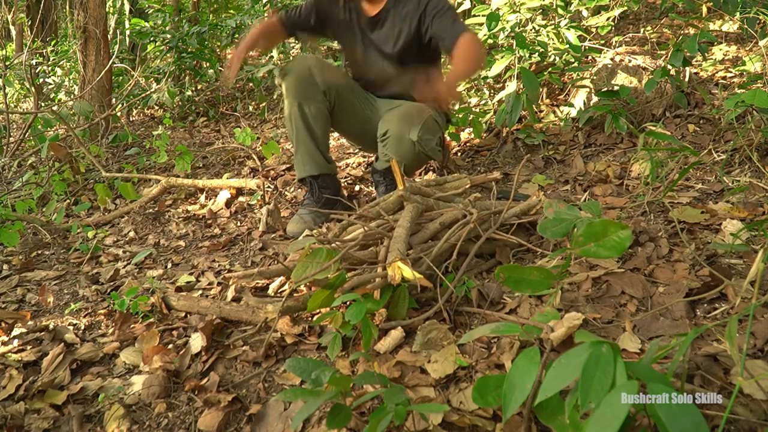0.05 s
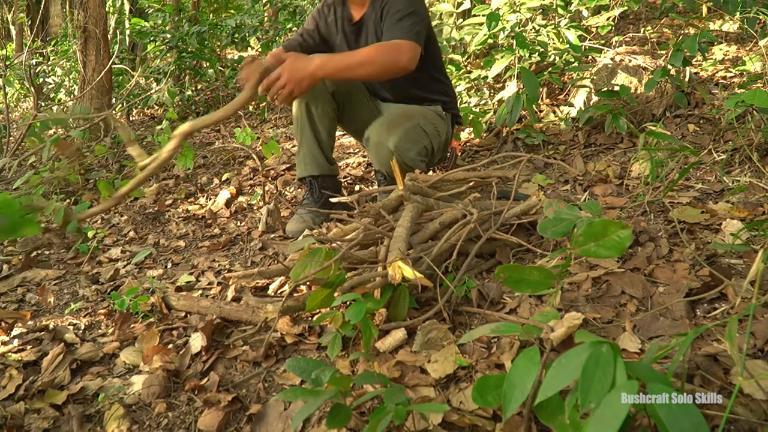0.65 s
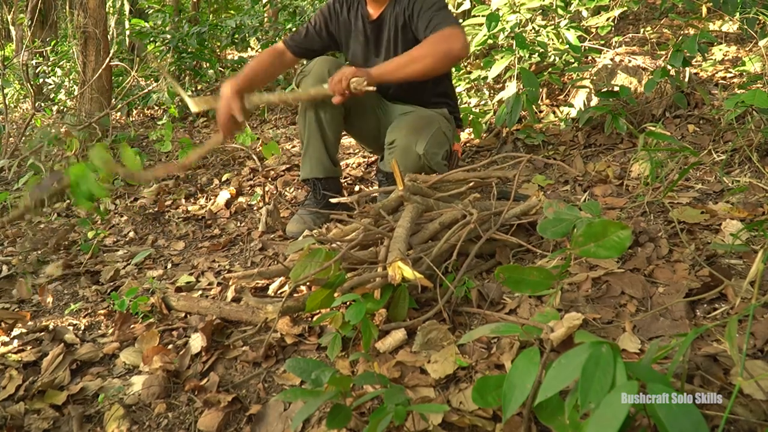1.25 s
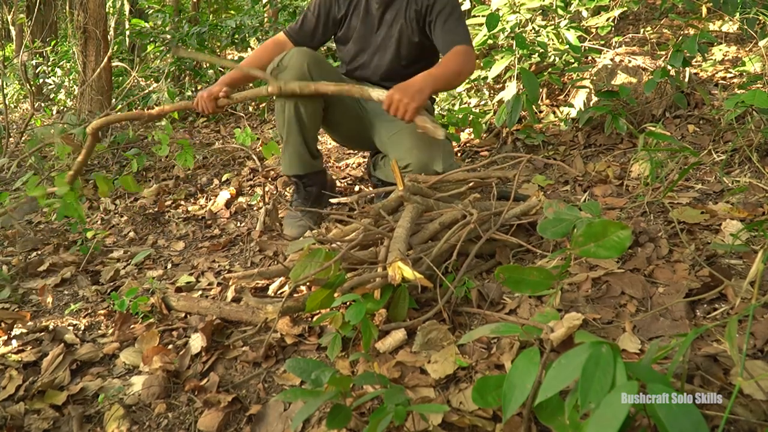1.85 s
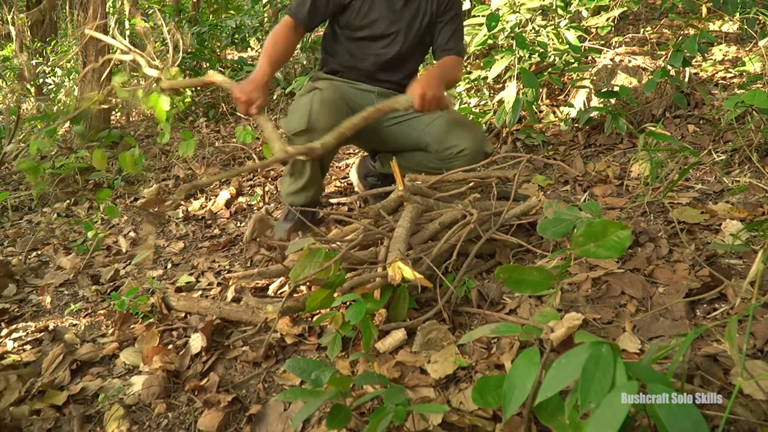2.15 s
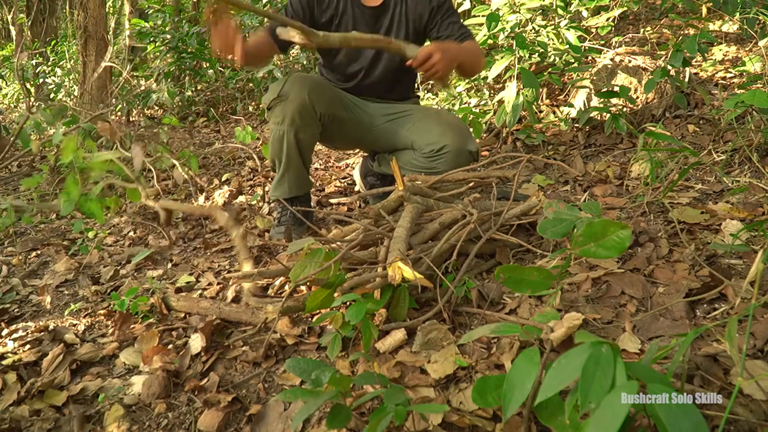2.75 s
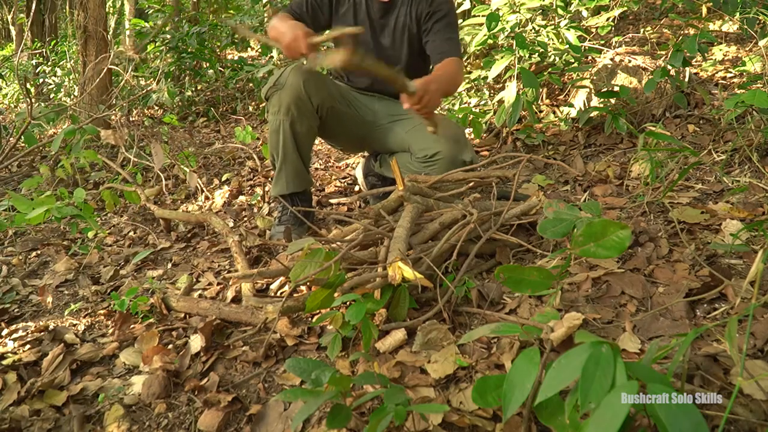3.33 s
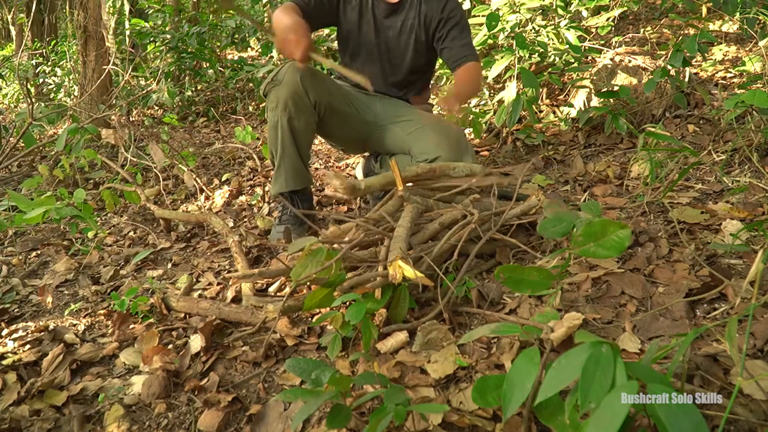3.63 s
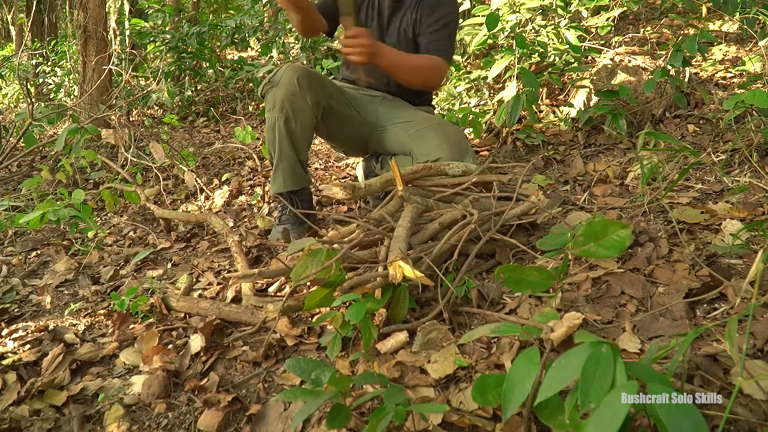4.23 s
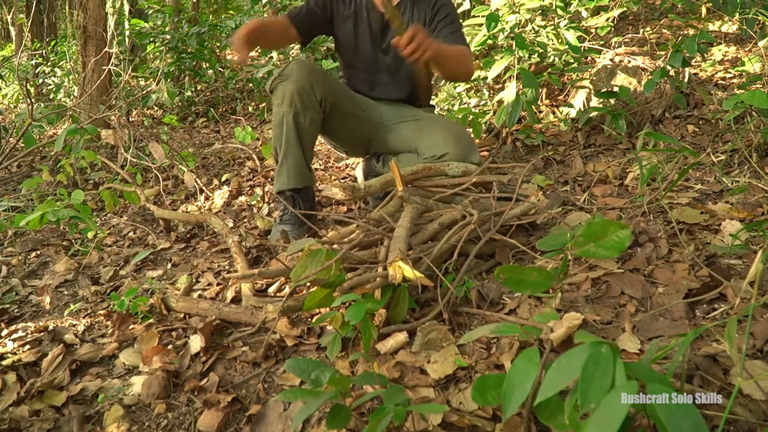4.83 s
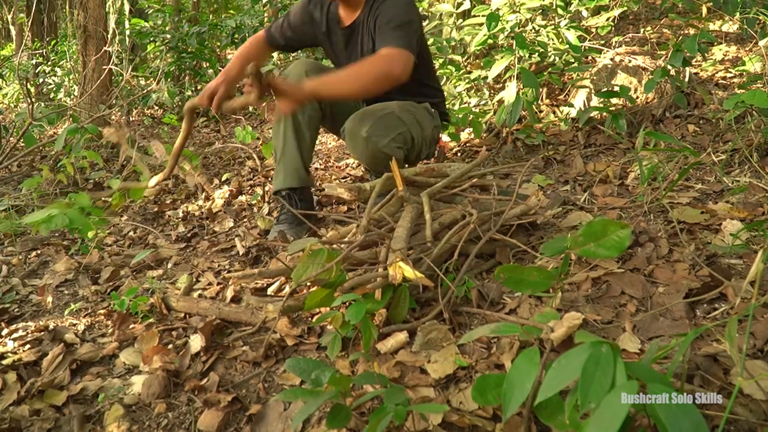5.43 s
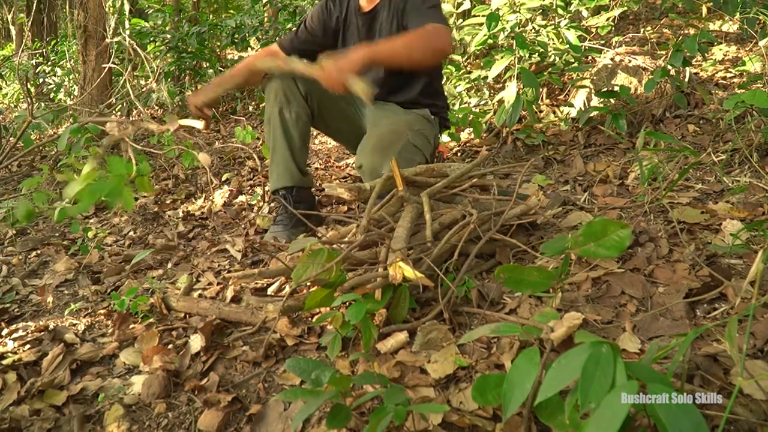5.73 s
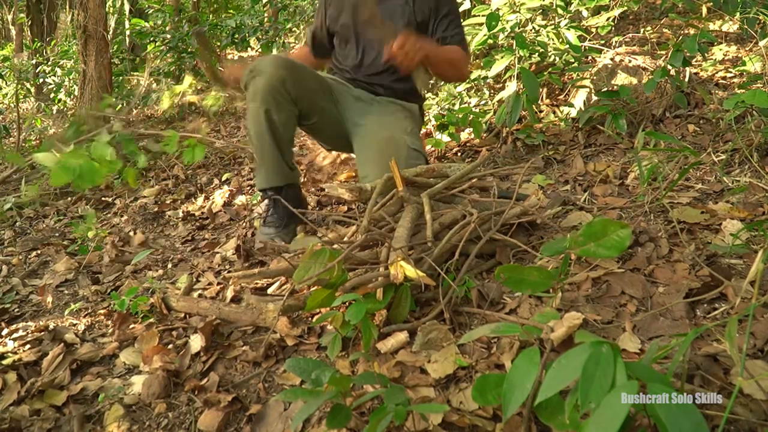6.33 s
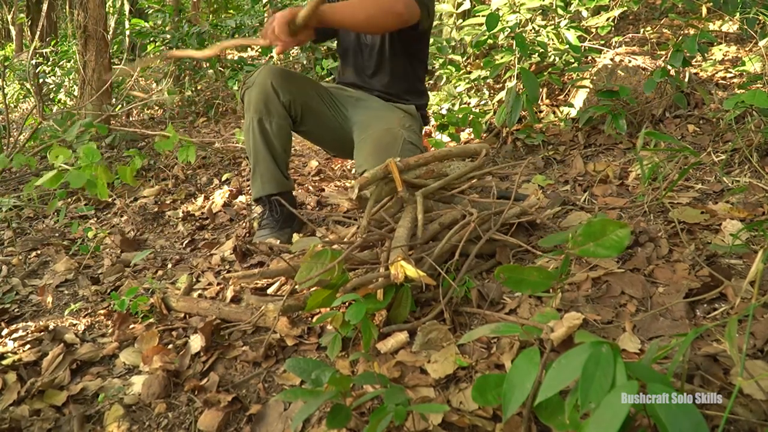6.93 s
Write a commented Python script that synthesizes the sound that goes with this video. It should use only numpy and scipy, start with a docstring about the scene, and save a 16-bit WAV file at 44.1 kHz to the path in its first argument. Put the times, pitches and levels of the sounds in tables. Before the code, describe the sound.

A stick clicks at about 0.2 seconds, with a few faint, distant bird whistles. From 0.5 seconds a leafy branch is dragged and swung close by, slightly to the left, swishing in surges and crunching dead leaves. Between 2 and 2.5 seconds it breaks in a quick run of sharp, dry cracks and wooden clicks, and the rustle dies away by 3 seconds. A crisp snap with a short splintery tail comes at 3 seconds, a smaller crack and knock at 3.3, and a piece drops into leaves at 3.6. Another sharp snap follows at 4.2. Sticks knock onto a pile around 5.1 seconds. Foliage swishes again from 5.4, building to a cluster of cracks and loud clacks between 6 and 6.4, with a few last snaps near 6.7. A faint low engine drone and soft forest hiss run underneath, with very little echo.

```python
"""A stick clicks and dry leaves swish as someone drags branches over a forest floor, snaps them
and drops the pieces on a pile. Bent wood fractures in quick runs of cracks, struck sticks ring in
their bending modes, and countless small contacts merge into the rustle of foliage and dead leaves.
The trees scatter the sound of the wood and the ground reflects the rustle;
far off there is a low drone and birds call."""
import sys
import numpy as np
from scipy import signal
from scipy.fft import rfft, irfft, next_fast_len
from scipy.io import wavfile
from scipy.ndimage import uniform_filter1d

SR = 44100
rng = np.random.default_rng(int(sys.argv[2]) if len(sys.argv) > 2 else 0)


def pcm_store(signal):
    """Save signal as 16-bit PCM."""
    levels = np.round(np.clip(np.atleast_2d(signal), -1, 1) * 32767)
    wavfile.write(sys.argv[1], SR, levels.astype(np.int16).T)


N = 307377
TIME = np.arange(N) / SR

# A branch gives way: t/s, level/dB, f/Hz, left minus right/dB, gap to the last warning fibre/s,
# growth per fibre/dB, tail length/s, tail hiss/dB, tail crackle/dB
BREAKS = [(2.056, -18.5, 3800, 5, 0.028, 18, 0.097, -44, -28),
          (3.029, -17, 8130, 2, 0.0067, 5.5, 0.11, -29.5, -45),
          (4.198, -19, 7680, 1, 0.009, 5.5, 0.079, -29, -37),
          (6.2543, -18.5, 4600, 2.5, .0425, 4.5, 0.095, -24, -28.5)]


def breaks(count=4, hurry=1.12, pitch_step=1.24):
    """Progressive fracture: a bent branch fails fibre by fibre, each crack sooner, louder and lower."""
    out = np.zeros((2, N))
    for s, db, hz, pan_db, gap_s, growth_db, *_ in BREAKS:
        for to_go in range(count):  # counted back from the break
            fibre = crack(db - growth_db * to_go, hz * pitch_step ** to_go, pan_db)
            add(out, s - gap_s * to_go ** hurry, fibre)
    return out


def cracks():
    """Brittle fracture: side twigs and the last splinters snap one by one."""
    # t/s, level/dB, f/Hz, left minus right/dB
    snaps = [(0.185, -28, 4150, -4), (0.308, -35, 4670, -4), (1.3797, -27.5, 5720, 2),
             (2.0385, -22, 6400, 8), (2.0635, -19.5, 4000, -1), (2.0942, -21.5, 4400, 3),
             (2.1816, -19, 4960, 7), (2.203, -25, 5000, 9), (2.3778, -22, 4170, 2),
             (2.4145, -19.5, 5960, 10), (2.4758, -21.5, 7100, 10), (3.025, -26, 10540, 21),
             (3.0523, -20.5, 7500, -1), (3.0694, -27, 15200, 8), (3.09, -21, 6250, 3),
             (3.3163, -26, 5000, 2.5), (3.397, -42, 6000, -3), (3.8508, -43, 5440, -7),
             (4.286, -37, 4380, -4), (4.7684, -49.5, 8400, 4), (5.1173, -36, 2770, -4.5),
             (5.249, -30.5, 4130, -4), (5.289, -21.5, 4970, -4), (5.315, -37, 4400, -2),
             (6.056, -23, 4400, 7), (6.0699, -21.5, 3290, -0.5), (6.1026, -23.5, 8000, 5),
             (6.145, -25.5, 5050, 4), (6.1618, -21, 5400, 2), (6.3837, -31, 4300, -1),
             (6.6793, -22.5, 4260, -3.5), (6.7056, -27, 6340, -6), (6.8771, -27.5, 8070, 4)]
    out = np.zeros((2, N))
    for s, db, hz, pan_db in snaps:
        add(out, s, crack(db, hz, pan_db))
    return out


def crack(db, hz, pan_db, release_s=0.00085, splinter_s=0.014, splinter_db=-20, burst_db=-1.5, wood_db=-7):
    """Sudden release of strain: a fibre lets go and rings the wood; ragged finer splinters follow."""
    t = TIME[:SR // 5]
    low_hz, high_hz = hz / 1.6, hz * 1.31
    ragged = unit(uniform_filter1d(rng.standard_normal(len(t)), size=24))
    decay = np.exp(-t / release_s) + undb(splinter_db + 4.6 * ragged) * np.exp(-t / splinter_s)
    burst = spread(rng.choice([-1., 1.], (3, len(t))), apart_hz=16000) * decay
    # thick fibres crack low, thin ones only tick
    burst = band(burst, order=3, hz=0.67 * low_hz, kind="high")
    burst = band(burst, order=2, hz=1.4 * high_hz, kind="low")
    wood = ring(low_hz, 1.3 * low_hz, t60=0.016, tilt_db=3.5)
    sound = undb(burst_db) * strike(burst) + undb(wood_db) * wood
    return sound * undb(db) * place(pan_db)


def knocks():
    """Impulse excitation: sticks click and ring as they spring apart, collide or land on the pile."""
    # t/s, level/dB, first mode f/Hz, second mode f/Hz, first mode t60/s, tilt/(dB/octave), click/dB
    blows = [(0.178, -21.5, 1150, 1686, 0.035, 2, -26), (2.083, -16, 1390, 2030, 0.018, -2.5, -23),
             (2.1042, -26, 1460, 2220, .03, -15, -17.5), (2.389, -23.5, 686, 1350, 0.094, 8, -28),
             (2.78, -25, 790, 2560, 0.068, -9, -51), (3.312, -23, 773, 2575, 0.04, 10, -46),
             (3.4163, -35, 710, 1740, 0.05, 2.5, -30.5), (3.534, -42, 1540, 2660, 0.048, -7.5, -50),
             (3.6178, -33.5, 762, 1510, 0.071, -24, -36.5), (4.1998, -32, 933, 1980, 0.048, -6.5, -28),
             (4.855, -44.5, 837, 4630, 0.078, -1, -60.5), (5.127, -22, 1174, 1735, 0.058, -12, -39),
             (5.1555, -29, 570, 926, 0.11, -0.5, -28.5), (5.175, -35, 586, 1170, .07, 2, -39),
             (6.255, -30.5, 710, 1340, 0.044, -4, -24), (6.3102, -18, 2000, 2800, 0.015, -29, -19),
             (6.3698, -12.5, 1920, 2760, 0.02, -8, -26)]
    out = np.zeros((2, N))
    for s, db, first_hz, second_hz, t60, tilt_db, click_db in blows:
        wood = undb(db) * ring(first_hz, second_hz, t60, tilt_db) / 2
        click = crack(click_db, 1.75 * second_hz, pan_db=-3)
        add(out, s, wood + click)
    return out


def ring(first_hz, second_hz, t60, tilt_db, damping_power=0.17):
    """Damped free vibration: a struck stick rings in its bending modes, the higher ones dying sooner."""
    # Upper modes of a crooked stick: ratio to the second mode, level/dB
    upper_modes = [(1, 5), (1.351, -5.5), (1.829, -0.5), (2.17, -2.5), (2.8, -5)]
    t = TIME[:SR // 5]
    modes = [(first_hz, 0)] + [(second_hz * k, db) for k, db in upper_modes if second_hz * k < SR / 2]
    sound = 0
    for i, (hz, db) in enumerate(modes):
        gain = (-1) ** i * undb(db + tilt_db * np.log2(hz / first_hz))
        decay = np.exp(-np.log(1000) * t * (hz / first_hz) ** damping_power / t60)
        sound = sound + gain * np.sin(2 * np.pi * hz * t) * decay
    return strike(band(sound, order=3, hz=0.59 * first_hz, kind="high"))


def leaves(twig_db=-11):
    """Friction and impact: moving wood makes foliage swish, dead leaves crunch and the earth scuff."""
    # The leafy branch is pulled, swung or carried: t/s, length/s, swish/dB, crunch/dB, scuff/dB
    drags = [(0.065, 0.02, -57, -61, -66), (0.31, 0.12, -53, -48, -60.5), (0.485, 0.15, -28.5, -37, -49),
             (0.6, 2.1, -42.5, -58.5, -64.5), (0.675, 0.15, -30, -37, -47.5),
             (1.03, 0.12, -40.5, -55.5, -69), (1.565, 0.038, -32.5, -49, -59),
             (1.66, 0.018, -24, -36, -42.5), (1.77, 0.043, -37, -51.5, -57),
             (1.908, 0.29, -27, -39.5, -54.5), (2.305, 0.064, -29.5, -47, -52),
             (2.36, 0.11, -29, -37.5, -48.5), (2.76, .17, -49, -56, -60), (3.82, 0.02, -56.5, -72, -65),
             (5.27, 2.29, -41.5, -55, -64.5), (5.45, 0.092, -41.5, -47, -64), (5.6, 0.04, -29, -34, -48.5),
             (5.69, 0.033, -38, -43, -52), (5.83, 0.05, -30.5, -40, -51), (5.945, 0.15, -31, -42, -59.5),
             (6.255, 0.14, -25.5, -31, -42.5), (6.43, .13, -37, -46.5, -60),
             (6.66, 0.033, -45, -44.5, -56.5)]
    # Wood lands in dead leaves: t/s, length/s, swish/dB, crunch/dB, scuff/dB
    landings = [(0.615, .02, -48, -55, -44.5), (2.185, 0.019, -28, -30.5, -43.5),
                (2.775, 0.032, -36.5, -44.5, -55), (3.614, 0.034, -36.5, -34, -44.5),
                (5.125, 0.11, -48.5, -43.5, -45.5), (5.29, 0.06, -47, -42, -50.5)]
    # Where the foliage is: t/s, left minus right/dB
    sweep = [(.4, 0), (.6, 6.5), (1.95, 6), (2.2, 3), (2.8, 5.5), (3.1, -5), (5.3, 3), (5.45, 4.5),
             (6.0, 5.5), (6.3, 1.5), (6.97, 3.5)]
    # Spectra of foliage, dead leaves and earth: f/Hz, level/dB
    foliage = [(2500, -47), (4500, -7.5), (6200, -0.5), (8000, 1.5), (10000, -3.5), (16000, -3.5)]
    dead_leaves = [(900, -41), (1500, -2), (2100, 0), (2700, 1), (4000, 3), (5500, -4.5), (9000, -38)]
    earth = [(150, -36), (340, -3.5), (520, -10), (780, 4.5), (1150, -1), (2500, -15.5)]
    drag_power = stir(drags, attack_s=0.031, sag_db_s=0.6, release_db_s=164)
    landing_power = stir(landings, attack_s=0.0067, sag_db_s=65, release_db_s=222)
    swishing, crunching, scuffing = np.sqrt(drag_power + landing_power)
    pan_db, = curves(sweep)
    brushing = rustle(foliage, rate=16000, scatter_db=0, flutter_db=0.76, apart_hz=1858)
    swish = swishing * (brushing + undb(twig_db) * twigs())
    crunch = crunching * rustle(dead_leaves, rate=9000, scatter_db=1, flutter_db=1.6, apart_hz=2650)
    scuff = scuffing * rustle(earth, rate=3000, scatter_db=2, flutter_db=0.84, apart_hz=3600)
    return swish * place(pan_db) + crunch * place(0.5 * pan_db) + scuff


def rustle(spectrum, rate, scatter_db, flutter_db, apart_hz):
    """Shot noise: countless random contacts of uneven size merge, swelling in small flurries."""
    hits = rng.random((3, N)) < rate / SR
    sizes = undb(scatter_db * np.minimum(rng.exponential(size=(3, N)), 6))
    flurry = unit(uniform_filter1d(rng.standard_normal(N), size=300))
    contacts = spread(hits * sizes * rng.standard_normal((3, N)), apart_hz) * undb(flutter_db * flurry)
    return colour(crinkle(contacts, depth_db=2.5), spectrum)


def crinkle(x, depth_db):
    """Random modulation: leaves of different sizes take turns, so each band swells by itself."""
    spectra = signal.stft(x, nperseg=512)[2]
    swell = uniform_filter1d(rng.standard_normal(spectra.shape[1:]), size=16, axis=0)  # over frequency
    swell = uniform_filter1d(swell, size=9, axis=1)  # over time
    return signal.istft(spectra * undb(depth_db * unit(swell)))[1][:, :N]


def stir(events, attack_s, sag_db_s, release_db_s, hop=32):
    """Incoherent sources add in power: in each layer, events build up, sag and die away."""
    power = 0
    for s, length, *layers_db in events:
        age = np.maximum(TIME[::hop] - s, 0)
        fall_db = sag_db_s * age + release_db_s * np.maximum(age - length, 0)
        envelope = np.minimum(age / attack_s, 1) * undb(-fall_db)
        power = power + np.outer(undb(layers_db), envelope) ** 2
    return np.repeat(power, hop, axis=1)[:, :N]


def twigs(rate=30, scatter_db=4, tick_s=0.00083):
    """A Poisson process: tiny twigs and leaf stalks tick independently of one another."""
    hits = (rng.random(N) < rate / SR) * undb(scatter_db * np.minimum(rng.exponential(size=N), 2))
    decay = signal.lfilter([1], [1, -np.exp(-1 / (tick_s * SR))], hits)
    return unit(band(decay * rng.standard_normal(N), order=2, hz=3030, kind="high"))


def break_tails(pan_db=2, crackle_edge_share=0.29):
    """Exponential decay: a short, bright hiss and a coarser crackle linger after each break."""
    # Spectra of the hiss and the crackle: f/Hz, level/dB
    hiss_spectrum = [(2500, -26), (4500, -10), (6500, 3.5), (9000, 2.5), (12000, -2.5), (16000, -1)]
    crackle_spectrum = [(900, -40), (1500, -6), (2200, -13), (3000, 1), (4200, 1.5), (6000, -5),
                        (9000, -25)]
    hiss = rustle(hiss_spectrum, rate=12000, scatter_db=4, flutter_db=2.7, apart_hz=1910)
    crackle = rustle(crackle_spectrum, rate=3500, scatter_db=1, flutter_db=2, apart_hz=2700)
    out = 0
    for s, _, hz, *_, length, hiss_db, crackle_db in BREAKS:
        power = stir([(s, length, hiss_db, crackle_db)], attack_s=0.013, sag_db_s=57, release_db_s=244)
        fine, coarse = np.sqrt(power)
        out = out + fine * hiss + coarse * band(crackle, order=4, hz=crackle_edge_share * hz, kind="high")
    return out * place(pan_db)


def thuds():
    """Band-limited noise: wide bands make dull low bumps, a narrow one the hum of a thrumming stick."""
    # t/s, length/s, f/Hz, half bandwidth in natural log of frequency, level/dB
    bumps = [(0.175, 0.053, 347, 0.17, -49.5), (0.419, 0.087, 234, 0.26, -51.5),
             (0.567, 0.14, 394, 0.15, -47.5), (2.771, 0.095, 330, 0.15, -45),
             (3.49, .22, 173, 0.038, -51.5), (3.616, 0.052, 312, 0.16, -46), (6.298, 0.23, 349, 0.18, -46)]
    out = np.zeros((2, N))
    for s, length, hz, width, db in bumps:
        age = np.linspace(0, 1, int(length * SR))
        edges_hz = hz * np.exp([-width, width])
        body = band(rng.standard_normal(SR // 2), order=2, hz=edges_hz, kind="band")[-len(age):]
        add(out, s, undb(db) * unit(body) * np.minimum(10 * age, 1) * (1 - age))
    return out


def handling(count=18, mean_db=-59, scatter_db=3, hz=6500):
    """Small-scale fracture: bits of bark tick faintly at random as the sticks are handled."""
    out = np.zeros((2, N))
    for when, size, pitch in rng.random((count, 3)):
        tick = crack(mean_db + scatter_db * (2 * size - 1), hz * 2 ** (pitch - .5), pan_db=-2)
        add(out, when * TIME[-1], tick)
    return out


def ground(x, share=0.22, soft_hz=3000, lag_s=0.001716):
    """Interference: a dull, inverted reflection from the soft ground ripples the low spectrum."""
    dull = band(x, order=1, hz=soft_hz, kind="low")
    reflection = np.array([np.interp(TIME - lag_s, TIME, channel) for channel in dull])
    return x - share * reflection


def trees(x, t60=0.16, build_s=0.0025, echo_db=-14):
    """Scattering: trunks and foliage return a short, diffuse echo."""
    t = TIME[:SR // 2]
    envelope = np.exp(-np.log(1000) * t / t60) * (1 - np.exp(-t / build_s))
    echo = spread(rng.standard_normal((3, len(t))), apart_hz=2500) * envelope
    return undb(echo_db) * signal.fftconvolve(x, unit(echo) / np.sqrt(len(t)), axes=1)[:, :N]


def birds(sag_per_s=0.44, waver=0.038, direct_db=-6, echo_db=-4):
    """Frequency modulation: far whistles sag and waver in pitch, blurred by the forest's echo."""
    # t/s, length/s, starting f/Hz, level before the forest/dB
    calls = [(0, 0.034, 3070, -46.5), (0.204, 0.064, 1020, -52.5), (0.247, 0.094, 1233, -45.5),
             (3.801, 0.11, 1310, -56), (3.993, 0.13, 1280, -59), (4.429, .09, 2110, -65)]
    out = np.zeros((2, N))
    for s, length, hz, db in calls:
        t = TIME[:int(length * SR)]
        wobble = unit(uniform_filter1d(rng.standard_normal(SR // 2), size=200))[:len(t)]
        phase = 2 * np.pi * np.cumsum(hz * (1 - sag_per_s * t + waver * wobble)) / SR
        add(out, s, undb(db) * np.hanning(len(t)) * np.sin(phase))
    return undb(direct_db) * out + trees(out, t60=0.25, build_s=0.0079, echo_db=echo_db)


def drone(octave_db=-15):
    """Periodic firing: a far engine is heard as a low tone and its second harmonic."""
    # The drone as heard drops away under the loud snap near 2.1 s and returns: t/s, f/Hz, level/dB
    contour = [(0, 84.6, -56.5), (.4, 97, -55), (1.1, 90, -52.5), (1.8, 72.7, -55.5), (2.1, 84.2, -83.5),
               (2.6, 88.3, -65), (6.3, 83.74, -63), (6.8, 75, -57.5)]
    hz, db = curves(contour)
    phase = 2 * np.pi * np.cumsum(hz) / SR
    return undb(db) * unit(np.sin(phase) + undb(octave_db) * np.sin(2 * phase))


def forest(mid_db=-58, side_hz=500):
    """Partly coherent noise: a low rumble common to both ears and a faint, wide hiss."""
    # Ambient spectrum: f/Hz, level/dB
    spectrum = [(20, -26.5), (45, -12), (80, 2.5), (170, -3.5), (260, -15.5), (900, -21.5), (1500, -22.5),
                (4000, -27.5), (8000, -35), (11000, -34), (16000, -42)]
    mid, side = (colour(rng.standard_normal(N), spectrum) for _ in range(2))
    side = band(side, order=2, hz=side_hz, kind="high")
    return undb(mid_db) * (mid + 0.76 * np.array([side, -side]))


def undb(db):
    """Decibels to amplitude ratio."""
    return 10 ** (np.asarray(db) / 20)


def unit(x):
    """Normalisation to an rms of one."""
    return x / np.sqrt(np.mean(x ** 2))


def strike(x):
    """Normalisation of a blow to unit deviation over its first four milliseconds."""
    return x / np.std(x[..., :SR // 250])


def curves(table):
    """Linear interpolation of a table's columns in time."""
    s, *columns = np.transpose(table)
    return [np.interp(TIME, s, c) for c in columns]


def colour(x, spectrum):
    """Spectral shaping by (f/Hz, level/dB) points, to an rms of one."""
    hz, db = np.transpose(spectrum)
    size = next_fast_len(N)
    f = np.fft.rfftfreq(size, 1 / SR)
    gain = undb(np.interp(np.log(f + 1), np.log(hz), db))
    return unit(irfft(rfft(x, size) * gain)[..., :N])


def band(x, order, hz, kind):
    """A maximally flat filter."""
    return signal.sosfilt(signal.butter(order, np.minimum(hz, .45 * SR), kind, fs=SR, output="sos"), x)


def place(pan_db):
    """Constant-power panning: left and right gains."""
    gains = undb(np.array([pan_db, -pan_db]).reshape(2, -1) / 2)
    return gains / np.sqrt(np.mean(gains ** 2, axis=0))


def spread(noises, apart_hz):
    """Decorrelation: three noises make two channels that share the bass and part in the treble."""
    bass = band(noises[0], order=1, hz=apart_hz, kind="low")
    return bass + band(noises[1:], order=1, hz=apart_hz, kind="high")


def add(out, s, sound):
    """Superposition of a sound, starting at s seconds."""
    i = int(s * SR)
    out[:, i:i + sound.shape[-1]] += sound[..., :N - i]


def scene():
    """Superposition of wood, leaves, their reflections and the far background."""
    wood = breaks() + cracks() + knocks() + handling()
    return wood + trees(wood) + thuds() + ground(leaves() + break_tails()) + birds() + drone() + forest()


def record(dry, top_hz=15900):
    """Band limiting: a steep low-pass filter cuts the top of the treble."""
    return signal.sosfilt(signal.ellip(10, .1, 70, top_hz, fs=SR, output="sos"), dry)


dry = scene()
out = record(dry)
pcm_store(out)
```